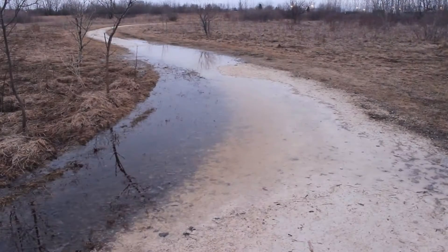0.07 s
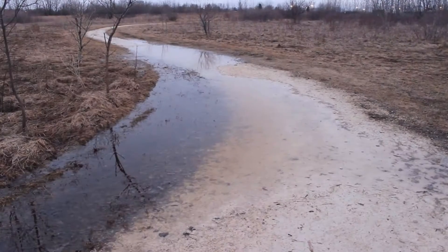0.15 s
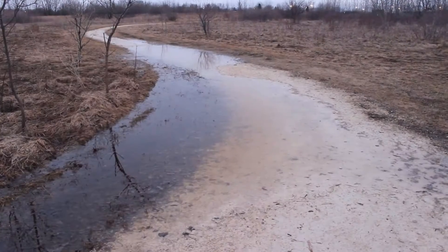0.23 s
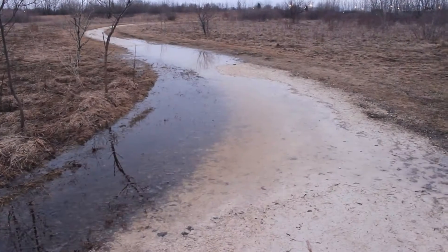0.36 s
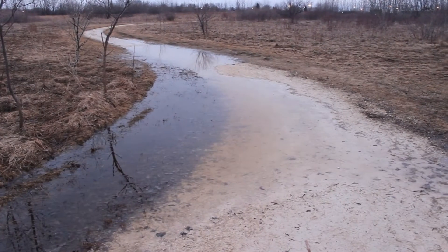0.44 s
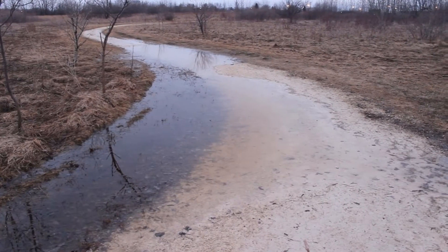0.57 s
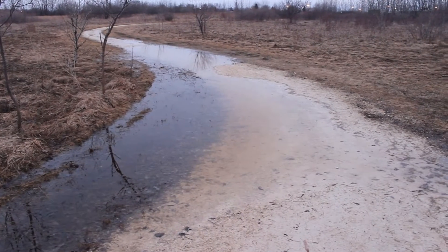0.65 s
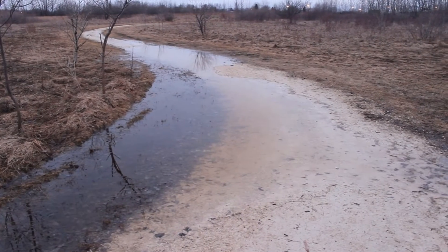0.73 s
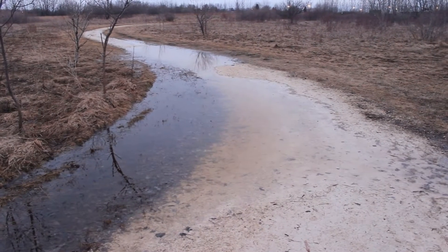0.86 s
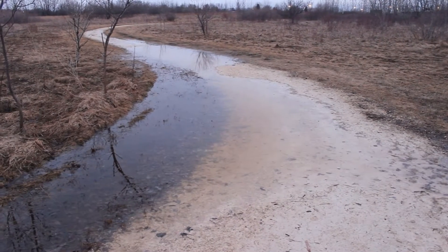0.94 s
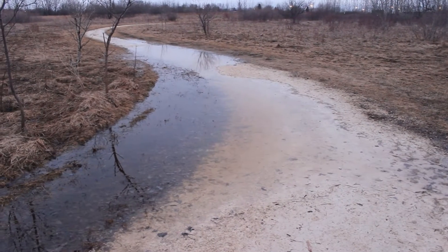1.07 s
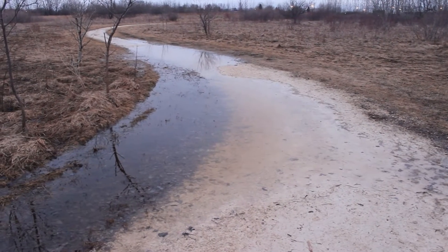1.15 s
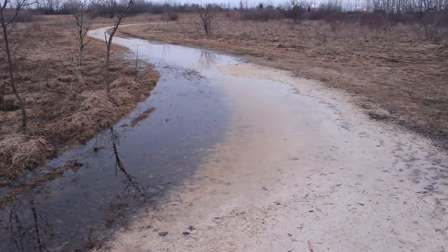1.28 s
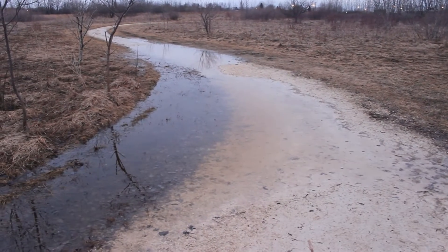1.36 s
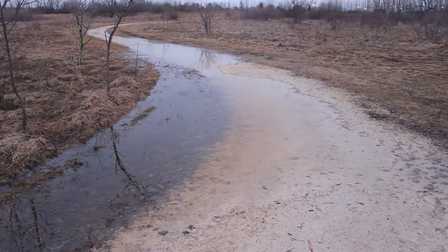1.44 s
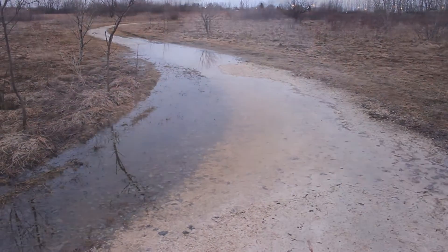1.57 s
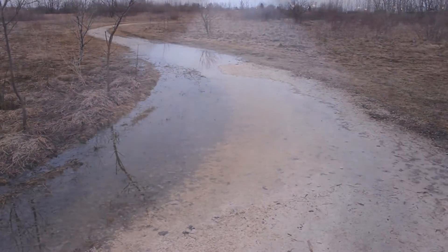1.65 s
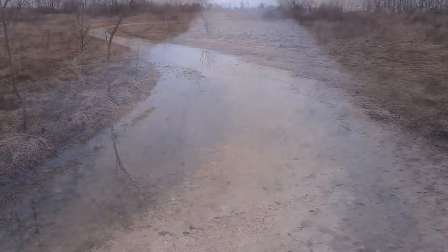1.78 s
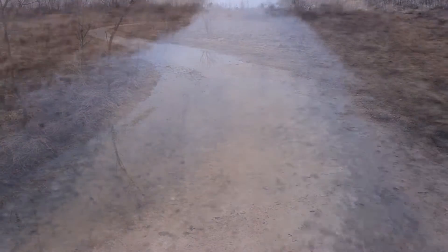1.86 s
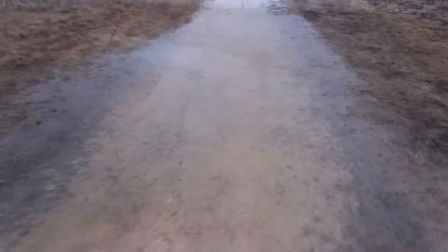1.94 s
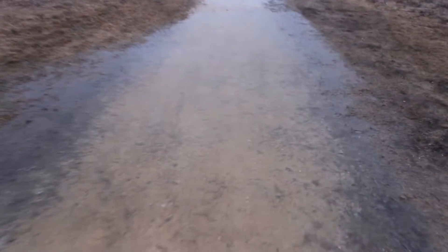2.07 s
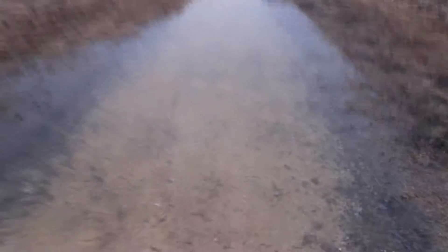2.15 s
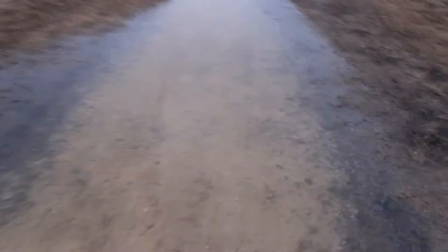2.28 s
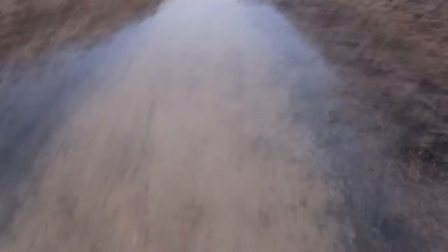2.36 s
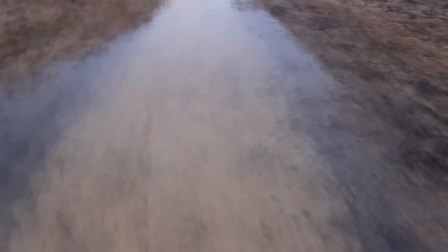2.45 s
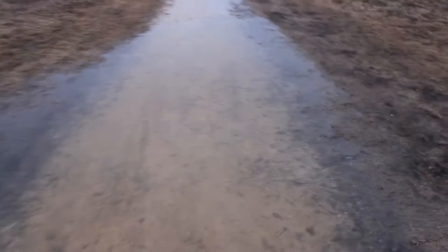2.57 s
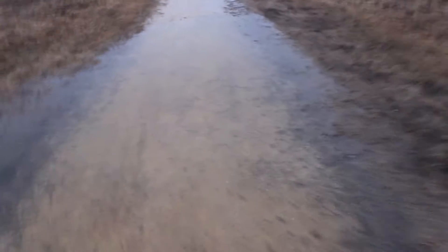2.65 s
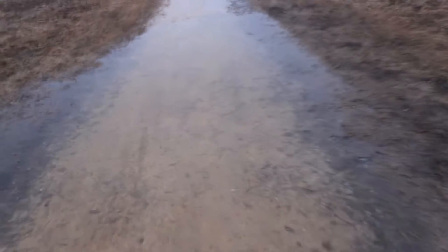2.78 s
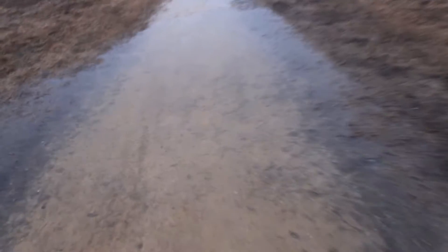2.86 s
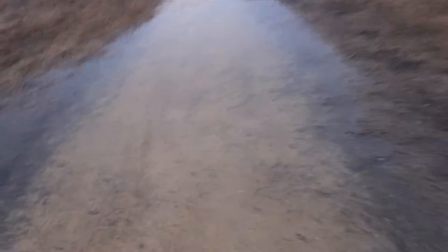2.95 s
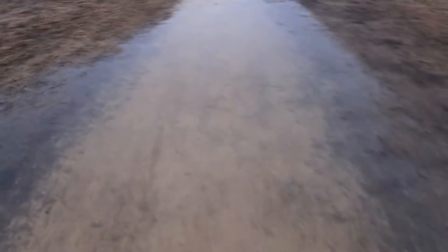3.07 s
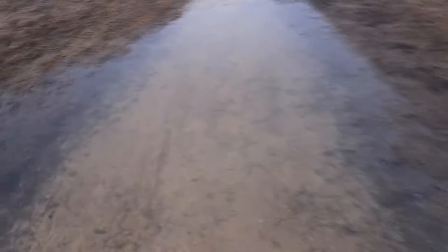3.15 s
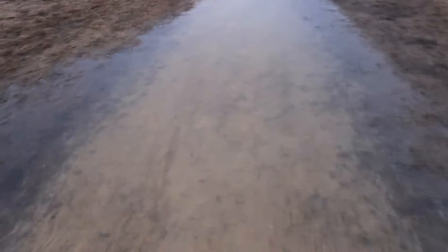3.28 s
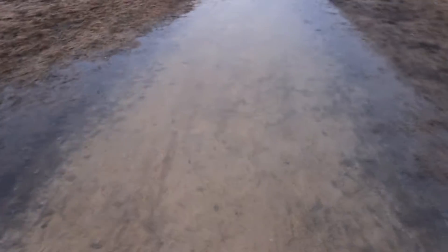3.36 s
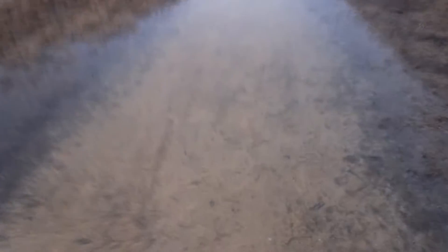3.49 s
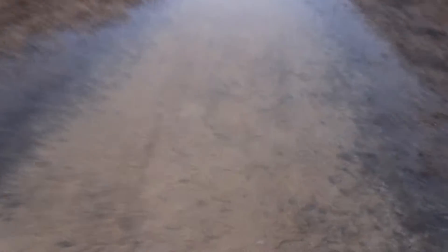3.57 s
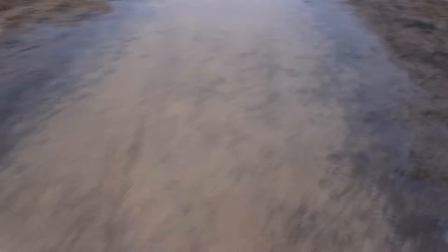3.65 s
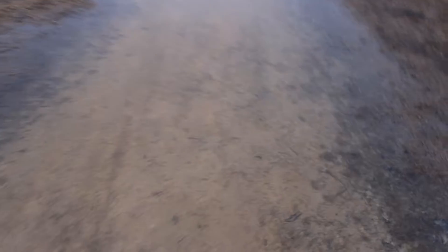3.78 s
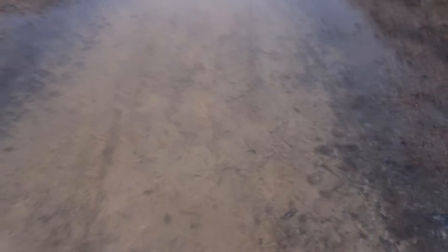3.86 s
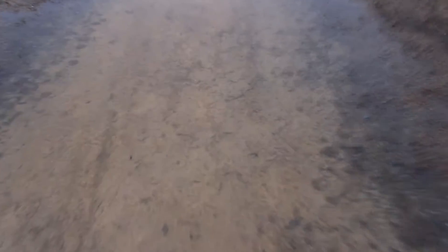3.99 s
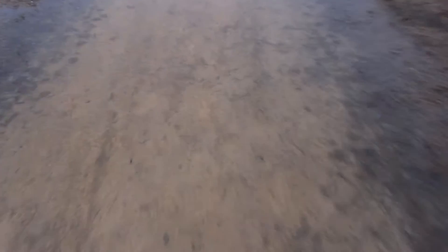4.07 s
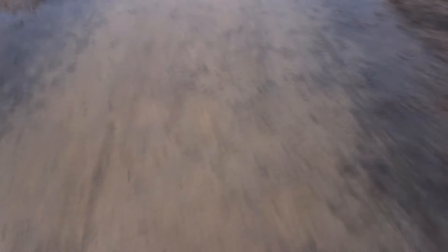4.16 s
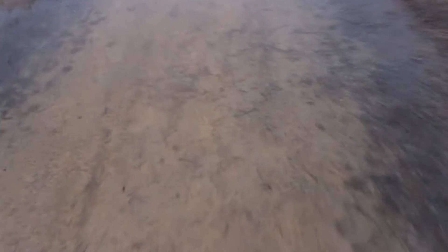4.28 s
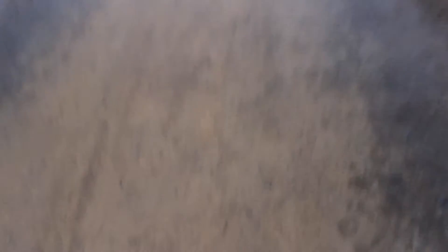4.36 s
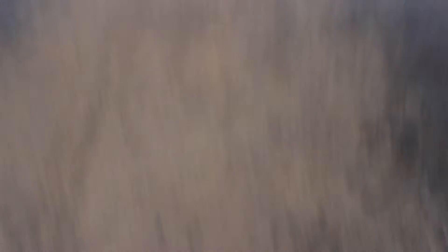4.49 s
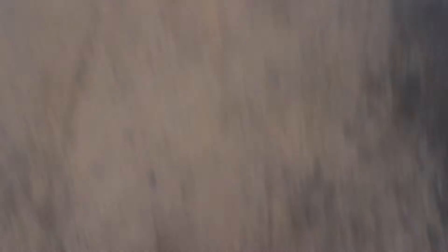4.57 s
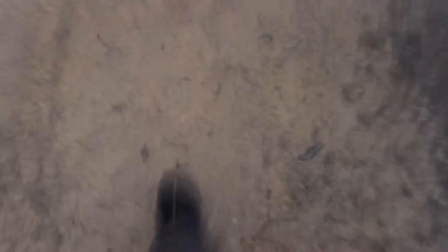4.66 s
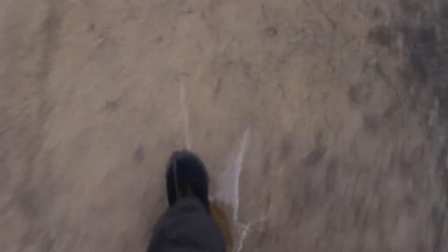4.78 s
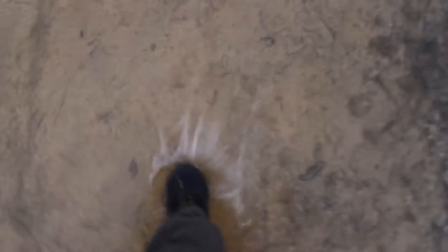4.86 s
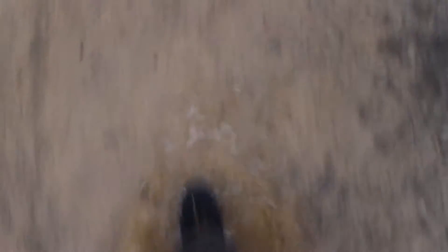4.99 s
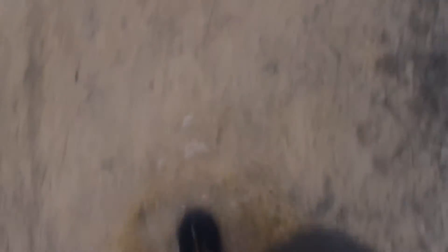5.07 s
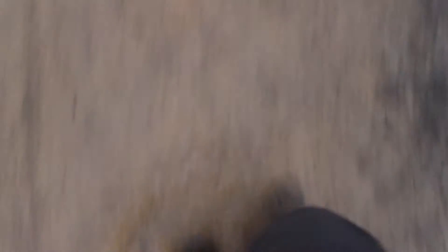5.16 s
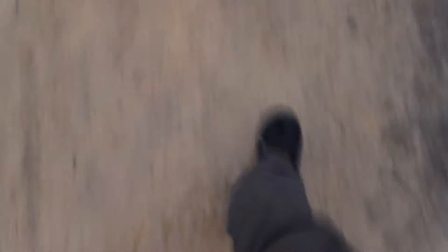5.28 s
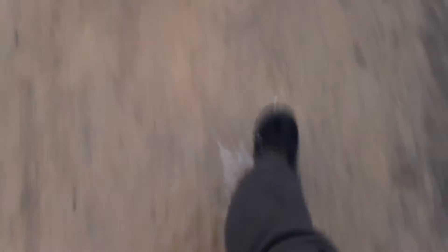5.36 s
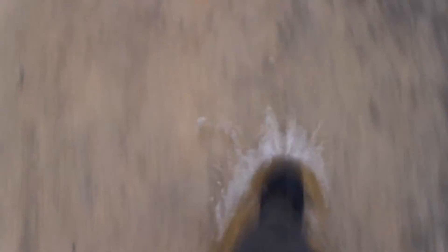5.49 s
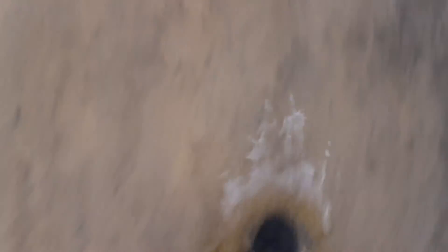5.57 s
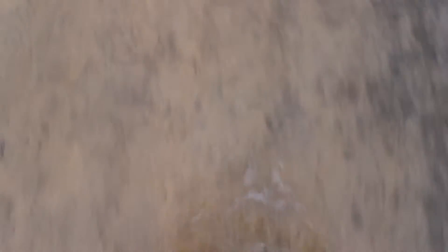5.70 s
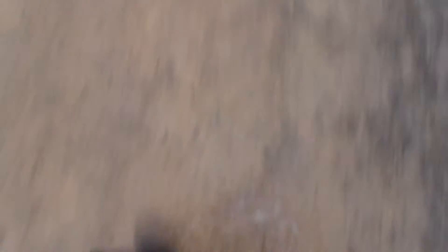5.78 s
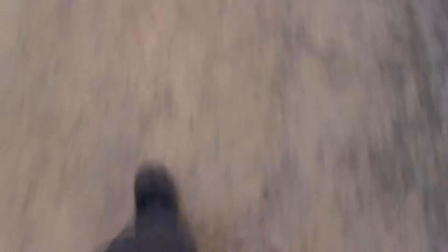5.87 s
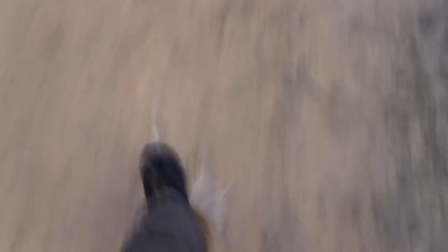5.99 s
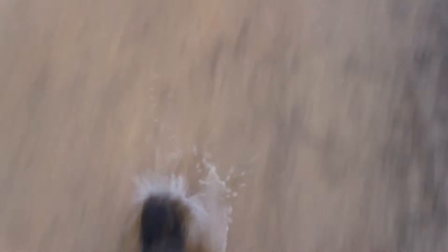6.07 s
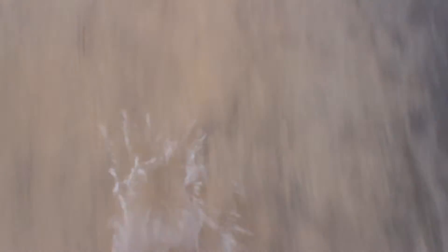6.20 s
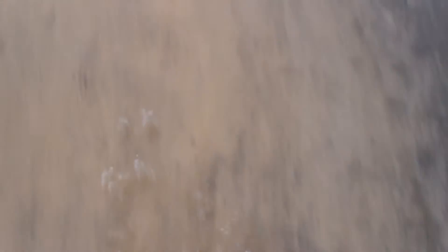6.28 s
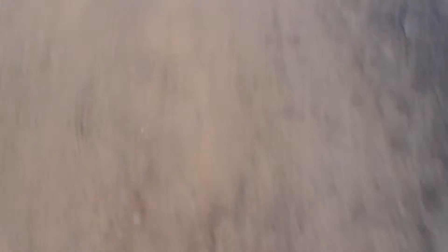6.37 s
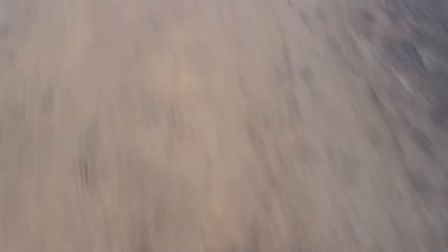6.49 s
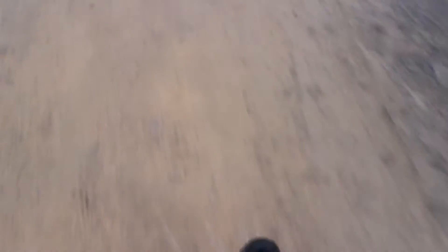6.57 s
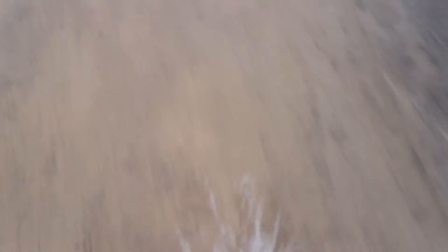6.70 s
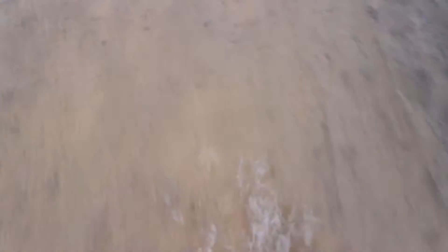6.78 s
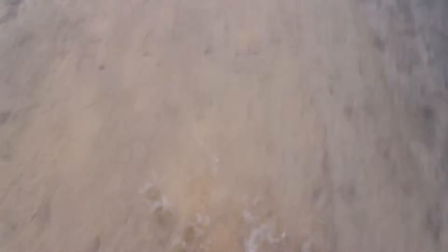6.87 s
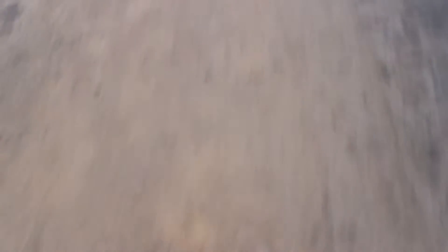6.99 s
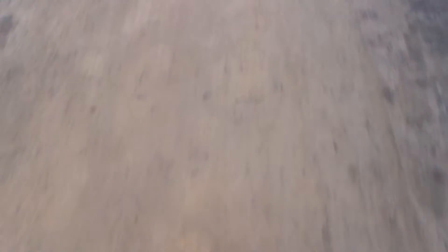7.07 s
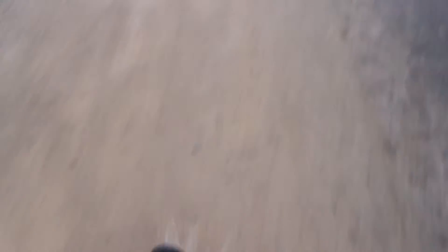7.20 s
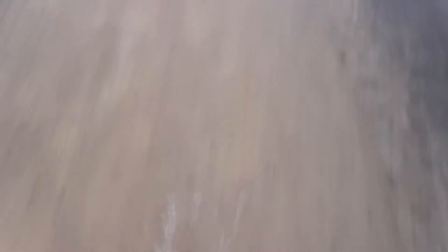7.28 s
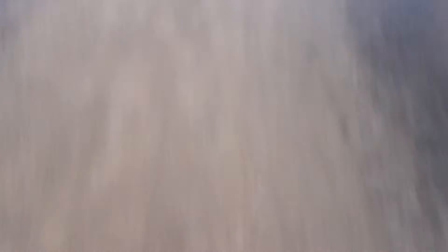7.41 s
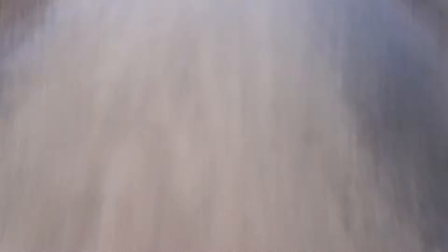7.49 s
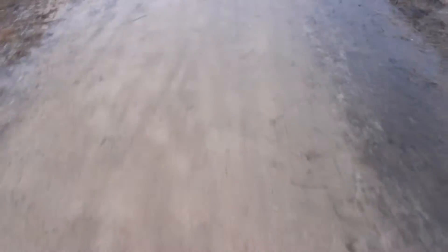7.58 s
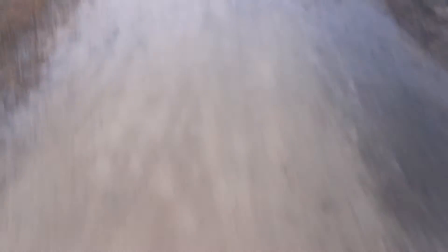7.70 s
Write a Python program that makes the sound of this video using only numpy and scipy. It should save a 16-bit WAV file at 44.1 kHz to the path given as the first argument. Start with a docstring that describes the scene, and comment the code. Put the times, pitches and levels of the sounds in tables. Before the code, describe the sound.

Outdoors in open country, a low soft wind rumble, distant wash and faint hum. A crow caws hoarsely at a moderate distance in the first second. Just after two seconds a softer, shorter call overlaps the first footstep on wet gravel. Steps crunch lightly, then turn into splashing wades with bubbly gurgles, spray and snapping drops, close to the microphone and increasingly loud.

```python
"""A walker crunches three steps on wet gravel, then wades along a flooded trail. Hiss and tiny rings make
the spray, crowds of short gliding rings make the gurgle, and single rings and noise bursts stand out
as air bubbles, stone knocks and snapping drops. A crow calls in rough stacks of sine waves, and faint
whistles glide far off. Behind lie shaped noise for the low rumble of open country and a far hum."""
import sys
import numpy as np
from scipy import signal
from scipy.fft import rfft, irfft
from scipy.io import wavfile
from scipy.ndimage import uniform_filter1d

SR = 44100
rng = np.random.default_rng(int(sys.argv[2]) if len(sys.argv) > 2 else 0)


def master(y):
    """Save y as 16-bit WAV."""
    cut = np.clip(np.atleast_2d(y).T, -1, 1)
    pcm = np.round(cut * 32767)  # scale
    wavfile.write(sys.argv[1], SR, pcm.astype(np.int16))


N = 341334  # samples in the scene


def gain_of(db):
    """Turns decibels into a gain."""
    return 10 ** (np.asarray(db) / 20)


def evened(x):
    """Scales a sound to an average strength (rms) of 1."""
    return x / np.sqrt(np.mean(x ** 2) + 1e-20)


def read(points, hz):
    """Reads a spectrum between its points, on a log frequency axis."""
    f, value = np.transpose(points)
    return np.interp(np.log(hz + 1), np.log(f + 1), value)


def along(rows, column):
    """Reads one column of a timed table at every sample."""
    rows = np.asarray(rows)
    return np.interp(np.arange(N) / SR, rows[:, 0], rows[:, column])


def add(mix, s, sound):
    """Mixes a sound in at s seconds."""
    part = mix[round(s * SR):][:len(sound)]
    part += sound[:len(part)]


def coloured(x, points):
    """Filters a sound by a spectrum, then scales it to rms 1."""
    gain = gain_of(read(points, np.fft.rfftfreq(len(x), 1 / SR)))
    return evened(irfft(rfft(x) * gain, len(x)))


def wander(width, size=N):
    """Slow random drift of rms 1: noise averaged twice over width samples."""
    span = max(int(width), 1)
    once = uniform_filter1d(rng.standard_normal(size), span)
    return evened(uniform_filter1d(once, span))


def ring(hz, end_hz, length, rise=0.0001):
    """A sine that starts sharply and glides; a long ring holds its level, then collapses."""
    t = np.arange(int(1.7 * length * SR) + 40) / SR
    pitch = hz + (end_hz - hz) * np.minimum(t / length, 1.3)
    turns = np.cumsum(pitch) / SR
    hold = 1.1 + (hz * length / 9) ** 2  # more cycles, steeper collapse
    onset = 1 - np.exp(-t / rise)
    decay = np.exp(-(t / (1.05 * length)) ** hold)
    return np.sin(2 * np.pi * turns) * onset * decay


def grains(pitches_hz, cycles, glide, per_s, spread_db, colour):
    """Random rings of many pitches, each with its own sparse train of hits; a few are large."""
    out = np.zeros(N)
    for hz in pitches_hz:
        size_db = spread_db * np.minimum(rng.exponential(1, N), 4)
        size = gain_of(size_db) * rng.choice([-1, 1], N)
        train = size * (rng.random(N) < per_s / len(pitches_hz) / SR)
        end_hz = hz * (1 + glide * rng.random())
        length = cycles * rng.uniform(0.29, 1.53) / hz
        grain = ring(hz, end_hz, length, 0.087 / hz)
        level = gain_of(read(colour, hz)) * np.sqrt(hz)
        out += level * signal.oaconvolve(train, grain / np.linalg.norm(grain))[:N]
    return evened(out)


def splashes():
    """Spray is spurting hiss, tiny drops and sparse ticks; gurgle is small bubbles, slosh and larger plips."""
    # colour of the spray: f/Hz, relative level/dB per Hz
    spray_colour = [(880, -66), (1500, -9), (2040, -8), (2250, -7.5), (6320, -9.5), (6840, -13),
                    (15200, -17), (15800, -36)]
    # colour of the gurgle: f/Hz, relative level/dB
    gurgle_colour = [(180, -10.5), (300, 4), (457, -13.5), (604, -6), (734, -8.5), (1210, -1.5), (1900, -5),
                     (3500, -18), (4550, -5), (7700, -60)]
    # water trickling between the steps: t/s, spray level/dB, gurgle level/dB
    trickle_levels = [(2.1, -90, -90), (2.17, -61, -49), (2.7, -61.5, -56.5), (2.9, -64, -60),
                      (3.35, -60.5, -57.5), (3.53, -70, -49), (3.9, -56, -51), (4.06, -60.5, -55),
                      (4.6, -52, -46.5), (5.17, -47.5, -41), (5.35, -54.5, -50), (5.9, -48, -44.5),
                      (6.55, -49.5, -48.5), (7.13, -47, -42), (7.74, -43, -42)]

    spurts = gain_of(1.1 * wander(31) + 2.0 * wander(500))
    hiss = evened(coloured(rng.standard_normal(N), spray_colour) * spurts)
    drops = grains(np.geomspace(2500, 14000, num=32), cycles=3.8, glide=0.13,
                   per_s=1800, spread_db=4.4, colour=spray_colour)
    ticks = grains(np.geomspace(2500, 13000, num=16), cycles=3.8, glide=0.15,
                   per_s=160, spread_db=3.0, colour=spray_colour)
    spray = gain_of(-4.5) * hiss + gain_of(-4) * drops + gain_of(-7.0) * ticks
    # the trickle has its own blend of the same hiss, drops and ticks
    trickle = gain_of(-3) * hiss + gain_of(-6) * drops + gain_of(-5.0) * ticks

    froth = grains(np.geomspace(450, 3200, num=32), cycles=5.35, glide=0.35,
                   per_s=2200, spread_db=5.6, colour=gurgle_colour)
    slosh = evened(coloured(rng.standard_normal(N), gurgle_colour) * spurts)
    plips = grains(np.geomspace(800, 2600, num=16), cycles=4.8, glide=0.2,
                   per_s=350, spread_db=4.3, colour=gurgle_colour)
    gurgle = gain_of(-3.0) * froth + gain_of(-12.0) * slosh + gain_of(-5.0) * plips

    spray_gain, gurgle_gain = stirring()
    trickle_spray = gain_of(along(trickle_levels, 1)) * trickle
    gurgle_gain = gurgle_gain + gain_of(along(trickle_levels, 2))
    return spray_gain * spray + trickle_spray + gurgle_gain * gurgle


def stirring():
    """Gains of spray and gurgle: drips, heel slap, plunge, lull and closing water of every step."""
    # one row a step: heel lands t/s, drips before it level/dB, slap spray level/dB, slap gurgle level/dB,
    # boot plunges t/s, swell up to it duration/s, its spray level/dB, its gurgle level/dB,
    # water closes t/s, its spray level/dB, its gurgle level/dB, lull between the two level change/dB
    strides = [(2.222, -70, -56, -51, 2.243, .03, -48, -33, 2.33, -53, -45.5, -6),
               (2.94, -76, -50, -50, 3.021, .09, -39.5, -31.5, 3.07, -54, -53, -7.5),
               (3.58, -68, -40, -54, 3.66, 0.058, -27.5, -31, 3.836, -47.5, -53, -8),
               (4.114, -79, -44, -55, 4.312, 0.19, -30.5, -29.5, 4.515, -40, -39.5, -2),
               (4.763, -39.5, -29, -30.5, 4.95, 0.14, -27, -26, 5.14, -33.5, -32, -5.5),
               (5.43, -59, -34, -48, 5.609, .24, -26, -23, 5.783, -36.5, -30, -3.5),
               (6.032, -47, -26, -40, 6.228, 0.18, -23, -21, 6.46, -27, -33.5, -8),
               (6.643, -47.5, -24.5, -34, 6.815, 0.12, -30, -26, 7.025, -29.5, -29, 1),
               (7.271, -41, -26.5, -28, 7.415, .15, -28.5, -27, 7.65, -32.5, -33, 0)]
    # water running off the lifted boot: how long before the heel it peaks, and its slopes
    drip_lead_s, drip_rise_db_per_s, drip_fall_db_per_s = 0.066, 600, 32
    drip_gurgle_db = -4.5  # gurgle of the drips, relative to their spray
    slap_hold_s, slap_rise_db_per_s, slap_fall_db_per_s = 0.015, 1500, 650
    plunge_rise_db = 37.5  # climb over the swell
    close_fall_db_per_s = (654, 452)  # spray, gurgle: gurgle outlasts spray

    t = np.arange(0, N + 64, 64) / SR  # one point every 64 samples
    out = np.zeros((2, len(t)))
    for (heel, drip_db, *slap_db, plunge, swell, spray_db, gurgle_db,
         close, end_spray_db, end_gurgle_db, lull_db) in strides:
        u = np.clip((t - plunge) / (close - plunge), 0, 1)  # 0 at the plunge, 1 as the water closes
        lull = lull_db * np.sin(np.pi * u ** 0.71)
        swell_db = plunge_rise_db * np.maximum(plunge - t, 0) / swell
        drips = peak(t, heel - drip_lead_s, drip_db, drip_rise_db_per_s, drip_fall_db_per_s)
        drips = drips * (t < heel)
        held = t - np.clip(t - heel, 0, slap_hold_s)  # time stands still while the slap holds
        ends = [(spray_db, end_spray_db), (gurgle_db, end_gurgle_db)]
        for k, (first_db, last_db) in enumerate(ends):
            fall_db = close_fall_db_per_s[k] * np.maximum(t - close, 0)
            wade = gain_of(first_db + (last_db - first_db) * u + lull - swell_db - fall_db)
            slap = peak(held, heel, slap_db[k], slap_rise_db_per_s, slap_fall_db_per_s)
            out[k] = out[k] + wade + slap + drips * gain_of(k * drip_gurgle_db)
    return [np.interp(np.arange(N) / SR, t, gain) for gain in out]


def peak(t, s, db, rise_db_per_s, fall_db_per_s):
    """A gain that climbs to db at s seconds and falls away, both in straight decibel slopes."""
    drop_db = np.where(t < s, rise_db_per_s * (s - t), fall_db_per_s * (t - s))
    return gain_of(db - drop_db)


def bubbles():
    """Large trapped air pockets, each ringing at its own gliding pitch."""
    # the largest air pockets: t/s, level/dB, start f/Hz, end f/Hz, length/s
    pockets = [(2.238, -18.5, 1024, 634, 0.007), (2.261, -19.5, 473, 680, 0.003),
               (2.321, -23, 2020, 2030, 0.001), (2.332, -24.5, 2000, 2000, 0.0017),
               (2.412, -25.5, 805, 810, 0.0016), (3.03, -15, 1760, 1730, 0.001),
               (3.712, -28, 596, 740, 0.0099), (4.225, -27, 2250, 2250, 0.0037),
               (4.234, -25, 2130, 2090, 0.0026), (4.246, -32, 2000, 2000, 0.0023),
               (4.308, -22, 1200, 1530, 0.0093), (4.3584, -15.5, 455, 690, 0.017),
               (4.3594, -12.5, 1300, 1140, 0.0035), (4.392, -19.5, 1040, 1280, 0.0045),
               (4.4584, -9.5, 1590, 1851, 0.0014), (4.508, -26, 620, 720, 0.008),
               (4.948, -14, 1679, 1636, 0.0015), (4.962, -20.5, 490.2, 605, 0.0066),
               (5.067, -13.5, 1840, 1800, 0.0017), (5.0972, -14, 752, 1560, 0.029),
               (5.1445, -14, 1490, 1440, 0.0032), (5.429, -12.5, 1840, 1900, 0.0014),
               (5.594, -20, 2120, 2030, 0.0068), (5.605, -17, 1180, 1248, 0.003),
               (5.654, -17.5, 1000, 1220, 0.0065), (5.667, -18, 1695, 1480, 0.0082),
               (5.718, -2.5, 1451, 1180, 0.001), (5.7336, -12, 970, 960, 0.0022),
               (5.793, -20, 1710, 1890, 0.0042), (5.85, -31.5, 640, 700, 0.01),
               (6.03, -9, 2470, 2740, 0.001), (6.203, -21, 1566, 1485, 0.0135),
               (6.226, -15, 1310, 1270, 0.0073), (6.253, -20, 1500, 1400, 0.006),
               (6.259, -18, 600, 450, 0.004), (6.2755, -15, 2010, 2060, 0.0025),
               (6.278, -18, 850, 850, 0.0061), (6.292, -13.5, 840, 818, 0.0027),
               (6.334, -17, 1910, 1900, 0.0022), (6.383, -12, 710, 1064, 0.0092),
               (6.3871, -7.5, 1500, 1740, 0.0041), (6.428, -9.5, 2318, 2340, 0.002),
               (6.559, -26, 2300, 2350, 0.0036), (6.67, -26.5, 1390, 1210, 0.0097),
               (6.813, -19, 1722, 1750, 0.0022), (6.838, -21, 1350, 1320, 0.0036),
               (6.8596, -22.5, 674, 529, 0.021), (6.894, -14, 2500, 2640, 0.0025),
               (6.934, -8.5, 1880, 2000, 0.0025), (6.9605, -12, 1220, 1170, 0.0017),
               (6.961, -18.5, 344, 256, 0.0064), (6.993, -14.5, 1600, 1500, 0.004),
               (7.051, -23, 855, 860, 0.0067), (7.099, -23, 2720, 2770, 0.0032),
               (7.1, -27, 950, 1000, 0.0056), (7.266, -14, 2340, 2370, 0.004), (7.35, -27, 660, 716, 0.017),
               (7.4267, -15, 1507, 1510, 0.0037), (7.4503, -9.5, 1130, 1171, 0.0025),
               (7.491, -19, 490, 477, 0.013), (7.5151, -18.5, 510, 300, 0.0035),
               (7.58, -14.5, 600, 315, 0.01), (7.6, -7, 1700, 1940, 0.0014)]
    out = np.zeros(N)
    for s, db, hz, end_hz, length in pockets:
        add(out, s, gain_of(db) * ring(hz, end_hz, length))
    return out


def snaps():
    """Stone knocks and drop snaps: noise bursts around a centre pitch, the narrower the longer."""
    # the clearest knocks and snaps: t/s, peak level/dB, centre f/Hz, width/octaves
    knocks = [(1.708, -34, 4340, 1), (2.221, -17, 700, 2.15), (2.242, -10.5, 505, 2.5),
              (2.246, -22, 3470, 1.5), (2.2593, -32, 4000, 1.2), (2.2868, -26.5, 3620, 0.62),
              (2.319, -28, 3500, 1), (2.3428, -33, 5000, 1.6), (2.383, -38, 4600, 0.7),
              (2.4072, -38.5, 4500, 0.7), (2.64, -38, 3200, 1), (2.68, -38, 3440, 0.82),
              (2.882, -37, 5000, 1.3), (2.935, -29, 2780, 3.9), (2.964, -27, 6000, 2.8),
              (2.994, -21.5, 6340, 0.99), (3.014, -26, 1790, 1.5), (3.0539, -30, 6000, 2.5),
              (3.0788, -36, 5000, 2), (3.5656, -34, 9000, 1.5), (3.598, -26, 5140, 1.1),
              (3.625, -27, 3940, 0.62), (3.6532, -12.5, 4750, 1.5), (3.731, -26, 3700, 0.31),
              (3.7651, -32, 4800, 0.5), (3.7989, -25, 6500, 1.2), (3.8167, -22, 7000, 3.3),
              (4.1146, -22, 4860, 1.6), (4.203, -27, 4600, 1.4), (4.4386, -11, 10335, 2),
              (4.476, -20, 7924, 1.3), (4.5027, -13.5, 3445, 4), (4.6806, -23, 11541, 2.1),
              (4.718, -23, 1700, 0.82), (4.771, -17, 5000, 0.99), (5.0298, -12, 5700, 1.4),
              (5.0812, -6, 14987, 3.5), (5.4082, -24, 5684, 0.59), (5.4316, -12.5, 2740, 2.1),
              (5.7251, -6.5, 3789, 4), (5.744, -22, 3020, 0.88), (5.7736, -9, 5940, 0.81),
              (5.7908, -10, 10600, 1.2), (5.915, -28, 3600, 0.5), (5.9392, -24, 6760, 1.2),
              (5.9726, -25.5, 3050, 0.75), (6.0384, -12, 2670, 0.62), (6.3572, -6.5, 5500, 2.4),
              (6.3987, -10.5, 6300, 0.49), (6.4563, -13, 6029, 2.6), (6.468, -23, 4400, 0.6),
              (6.4806, -24, 3200, 0.6), (6.5451, -24.5, 8100, 0.57), (6.6458, -3, 5630, 2),
              (6.6521, -5.5, 4000, 2.5), (6.686, -23, 3260, 0.6), (6.7524, -24, 7062, 0.72),
              (6.951, -17, 3000, 1.1), (7.0782, -8, 10400, 4.5), (7.138, -21, 12230, 7.5),
              (7.194, -18.5, 9600, 0.48), (7.275, -7.5, 2730, 1.06), (7.2878, -11, 5960, 0.81),
              (7.5633, -8.5, 5900, 2), (7.6643, -18, 5600, 0.44)]
    out = np.zeros(N)
    t = np.arange(512) / SR
    for s, db, hz, octaves in knocks:
        band = [(hz / 2 ** (1.4 * octaves), -30),
                (hz / 2 ** (0.99 * octaves), -9),
                (hz, 0),
                (hz * 2 ** (0.44 * octaves), -9),
                (hz * 2 ** (1.27 * octaves), -36),
                (hz * 2 ** (3 * octaves), -70)]
        life = 0.00065 + 4.1 / (hz * max(octaves, .2))  # decay time, s
        shape = (1 - np.exp(-t / (0.14 * life))) * np.exp(-t / life)
        crack = coloured(rng.standard_normal(len(t)), band) * shape
        add(out, s, gain_of(db) * crack / abs(crack).max())
    return out


def birds():
    """The crow and the far whistles, with a thin scatter of echoes from brush and water."""
    # the crow, one table a phrase: t/s, pitch f/Hz, level/dB, odd partials level/dB, half lines level/dB,
    # quarter lines level/dB, roughness/0-1, tilt/dB per octave
    phrases = [
        [(.585, 866, -64, 0, 13, 0, .4, -17), (.612, 1057, -57.5, 0, 11, 2, 0.6, -30),
         (.636, 1150, -55, 4, 13, 7, 0.2, -11)],
        [(.636, 858, -38, -12, -16, -20, 0.2, -12), (.655, 800, -36, 3, -25, -20, 0.26, -12),
         (.672, 830, -34, -4, -14, -16, 0.6, -6)],
        [(.663, 976, -44, -14, -20, -25, .1, -1), (.68, 960, -36.5, -1, -16, -28, .2, -2),
         (.705, 935, -38, -28, -13, -20, 0.1, 2), (.745, 944, -40, -30, -14, -10.5, 0.15, 2.5),
         (.805, 955, -44.5, -1, -6, -20, 0.2, 0.5), (.86, 888, -53.5, 11, -6, -38, 0.1, -2),
         (.91, 822, -55, 5, -19, -17, 0.1, -9), (.96, 809, -47, 5, -14, -13, 0.2, -14),
         (.985, 756, -56, -10, -16, -22, .1, -12)],
        [(2.055, 845, -54, -14, -9, -24, 0.2, -18), (2.08, 818, -56, -16, -11, -4, 0.5, -6),
         (2.108, 790, -44, -16, -14, -10, .4, -6)],
        [(2.092, 960, -46, -3, -35, -35, 0.2, -6), (2.14, 953, -47.5, -5, -35, -35, 0.2, -0.5),
         (2.19, 935, -50, -10, -35, -35, .05, -3), (2.225, 940, -59, -14, -35, -35, .05, -5)],
    ]
    # faint far whistles, one table each: t/s, f/Hz, level/dB
    far_whistles = [
        [(1.66, 1570, -55), (1.74, 1520, -57)],
        [(1.71, 4640, -69), (1.79, 4540, -68), (1.91, 4050, -73)],
        [(3.465, 1500, -56), (3.53, 1485, -55)],
    ]
    calls = np.zeros(N)
    for rows in phrases:
        add(calls, *caw(rows))
    for rows in far_whistles:
        add(calls, *whistle(rows))
    t = np.arange(SR // 2) / SR
    fade = gain_of(-60 * t / 0.82)  # falls at 60 dB per 0.82 s
    tail = rng.standard_normal(len(t)) * fade * (t > .008)
    echoes = signal.oaconvolve(calls, tail / np.linalg.norm(tail))[:N]
    return calls + gain_of(-16.5) * echoes


def caw(rows):
    """Sines on quarters of the pitch: uneven pulses feed the lines between; roughness smears them."""
    # throat and beak: f/Hz, level/dB
    throat = [(700, -24), (1300, 3.5), (1900, 3.5), (2500, -4), (3000, -9.5), (3800, -2.5), (4500, -4),
              (5200, -9.5), (6000, -40), (7500, -38)]
    s, *columns = np.transpose(rows)
    t = np.arange(s[0], s[-1], 1 / SR)
    hz, level_db, odd_db, half_db, quarter_db, rough, tilt_db = (np.interp(t, s, c) for c in columns)
    rough = np.clip(rough, 0, 1)
    shaky_hz = hz * (1 + .04 * rough * wander(60, size=len(t)))
    turns = np.cumsum(shaky_hz) / SR / 4
    out = np.zeros(len(t))
    for k in range(4, 30):  # k counts quarters of the pitch
        if k % 8 == 0:
            share_db = 0  # even partials
        elif k % 4 == 0:
            share_db = odd_db - 0.76 * max(k - 12, 0)  # the higher odd partials are weaker
        elif k % 2 == 0:
            share_db = half_db
        else:
            share_db = quarter_db
        colour_db = read(throat, k * hz / 4) + tilt_db * max(np.log2(k / 8), 0)
        flutter = 1 + rough * wander(130, size=len(t))
        line = np.sin(2 * np.pi * (k * turns + rng.random()))
        out += gain_of(share_db + colour_db) * flutter * line
    fades = signal.windows.tukey(len(t), min(0.01 / (t[-1] - t[0]), 1))
    return s[0], np.sqrt(2) * gain_of(level_db) * out * fades


def whistle(rows):
    """A gliding tone, its strength blurred by the long way through moving air."""
    s, hz, level_db = np.transpose(rows)
    t = np.arange(s[0], s[-1], 1 / SR)
    turns = np.cumsum(np.interp(t, s, hz)) / SR
    tone = np.sin(2 * np.pi * turns) * (1 + 0.45 * wander(120, size=len(t)))
    level = np.sqrt(2) * gain_of(np.interp(t, s, level_db))
    return s[0], level * tone * signal.windows.tukey(len(t), .2)


def country():
    """Open country: distant wash and lumpy wind on the microphone, both noise with drifting levels."""
    # levels over time: t/s, wind rumble level/dB, distant wash level/dB
    gust = [(0, -40.5, -39), (.5, -34, -39), (1.3, -39, -38), (2, -43.5, -37.5), (2.8, -40, -39.5),
            (4, -39.5, -41), (7.74, -41.5, -42.5)]
    # colour of the wind rumble: f/Hz, relative level/dB per Hz
    rumble = [(8.8, -39), (15, -19.5), (124, 3), (178, -0.5), (203, -6.5), (220, -6.5), (290, -21),
              (480, -120)]
    # colour of the distant wash: f/Hz, relative level/dB per Hz
    air = [(12, -40), (30, -11), (50, -3.5), (167, 0.5), (203, -11.5), (317, -7.5), (469, -7), (733, -7),
           (996, -14), (1560, -21), (2240, -30), (3300, -33.5), (5500, -39), (15800, -62)]
    wash_level = gain_of(along(gust, 2) + .6 * wander(9000))
    wash = wash_level * coloured(rng.standard_normal(N), air)
    lumps = gain_of(0.82 * wander(3000))
    wind = evened(lumps * coloured(rng.standard_normal(N), rumble))
    return wash + gain_of(along(gust, 1)) * wind


def hum():
    """A far hum: each line is noise in a very narrow band, so it wavers."""
    # wavering lines: f/Hz, width/Hz, level/dB
    lines = [(120.2, 7.6, -50.5), (171, 8.7, -47.5), (240.2, 2, -51), (476, 1.4, -61.5)]
    hz = np.fft.rfftfreq(N, 1 / SR)
    out = np.zeros(N)
    for f, width, db in lines:
        narrow = rfft(rng.standard_normal(N)) / (1 + ((hz - f) / width) ** 2)
        out += gain_of(db) * evened(irfft(narrow, N))
    return out


def microphone_hiss():
    """The microphone's own steady hiss: plain white noise."""
    return gain_of(-60) * rng.standard_normal(N)


def scene():
    """Sums all sources at one microphone."""
    walker = splashes() + bubbles() + snaps()
    background = country() + hum() + microphone_hiss()
    return (walker + birds() + background)[None]


def record(dry):
    """Limits the band: a low-pass filter takes away the highest treble."""
    edge_hz = 15850
    low_pass = signal.firwin(511, edge_hz, window=("kaiser", 9), fs=SR)
    return signal.oaconvolve(dry, low_pass[None], "same")


dry = scene()
out = record(dry)
master(out)
```